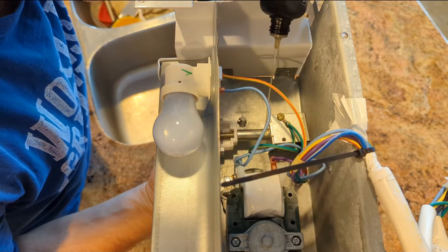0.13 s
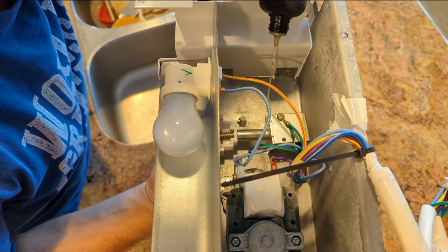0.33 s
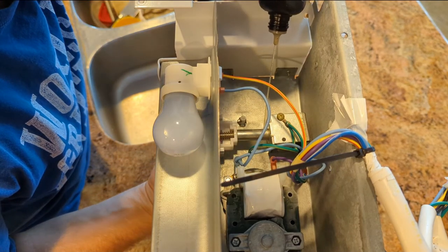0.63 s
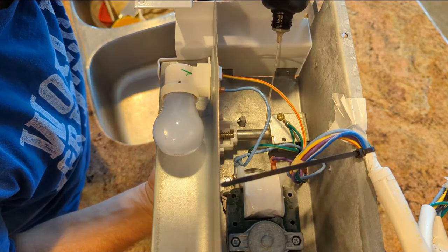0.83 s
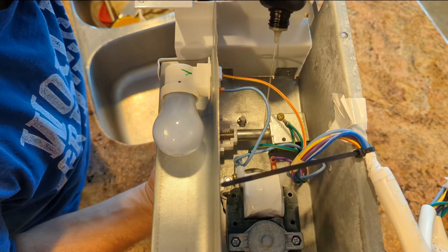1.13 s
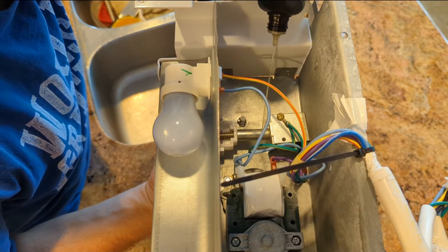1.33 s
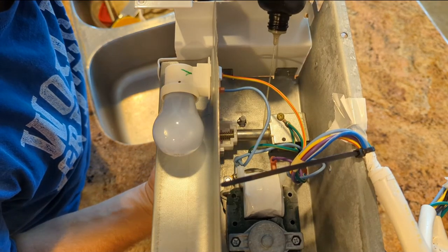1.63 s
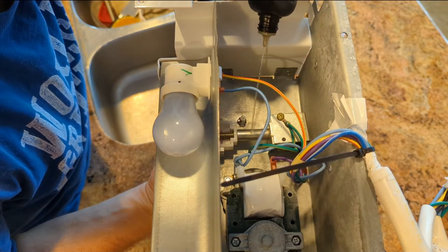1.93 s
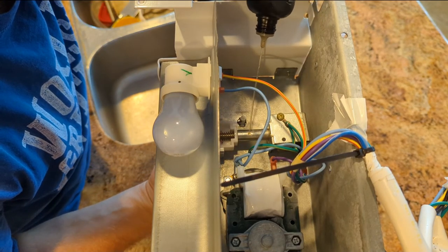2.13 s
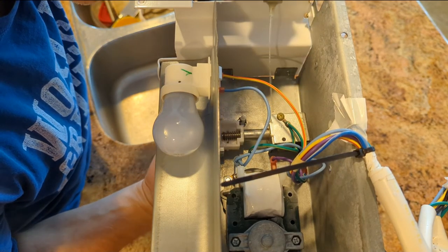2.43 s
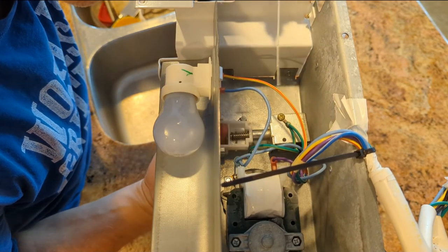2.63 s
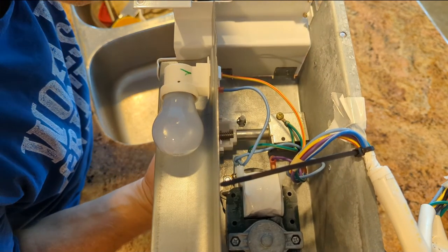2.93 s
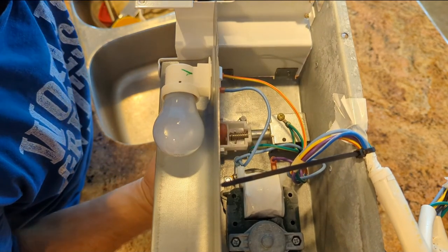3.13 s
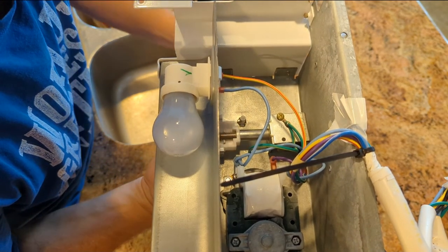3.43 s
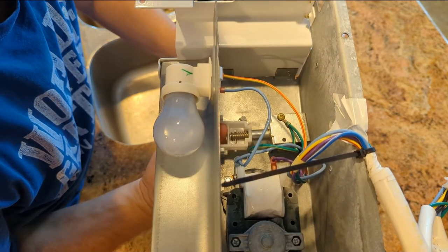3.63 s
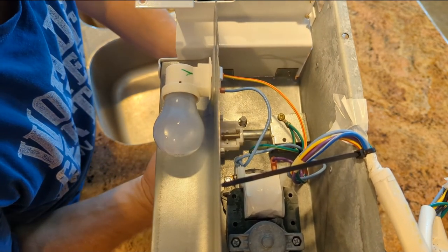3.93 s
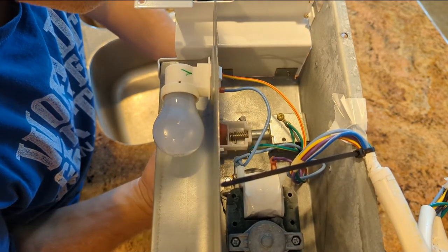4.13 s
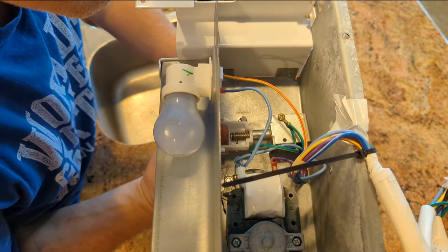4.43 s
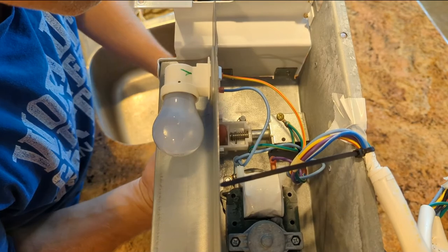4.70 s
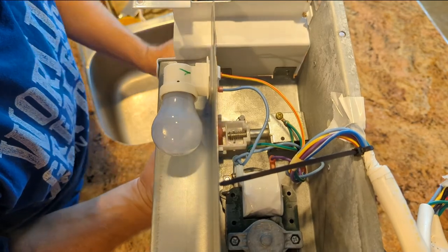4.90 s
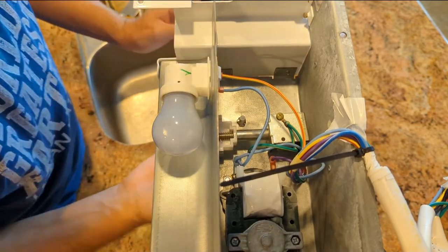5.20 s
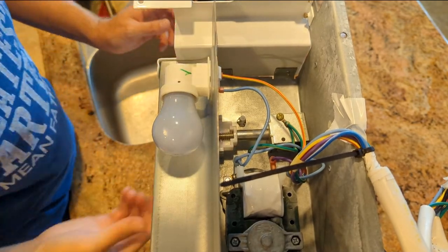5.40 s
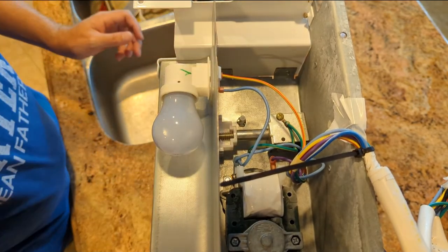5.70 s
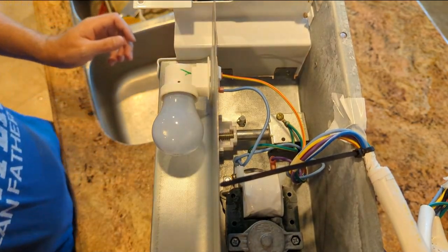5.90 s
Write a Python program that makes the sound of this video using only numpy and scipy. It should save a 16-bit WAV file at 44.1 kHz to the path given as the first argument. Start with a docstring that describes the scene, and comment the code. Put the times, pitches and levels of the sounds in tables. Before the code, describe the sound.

A quiet kitchen, soft air and a faint low drone from a distant appliance throughout. Tiny ticks at about 0.15 and 0.7 seconds are nearly lost in it. From 1.7 to 2.5 the hand fumbles the part: light taps, faint gritty sliding, soft clothing swishes. Short scrapes and clicks lead into the first slam at 2.6, a rattly metallic clack. Harder, tighter slams follow at 3.05, 3.5 and 3.95, and the hardest, brightest at 4.7. Each has a faint graze just before and a quick bounce after; thin sheet metal, plastic and a high steel rod ring, the room answers for about half a second, and the close microphone clips. Taps and short slides fall between, with a cloth swish near 3.75. After 5.0 only clothing swishes remain, with a dull light contact near 5.6 and a barely audible tick near 5.9, fading into room air.

```python
"""A hand works the spring-loaded plunger of an appliance part on a kitchen counter, over soft room air and
a distant appliance drone. Faint touches come first; then the plunger slides as gritty friction while clothes swish.
Five slams against the stop follow, each with a graze before and a bounce after: the sheet-metal frame,
plastic housing and steel rod ring, the kitchen answers, and peaks beyond full scale overload the recorder.
A few light contacts and swishes of cloth close the scene."""
import sys
import numpy as np
from scipy import signal
from scipy.fft import rfft, irfft
from scipy.io import wavfile
from scipy.ndimage import uniform_filter1d

SR = 44100
rng = np.random.default_rng(int(sys.argv[2]) if len(sys.argv) > 2 else 0)


def store_wav(level_fs):
    """Save 16-bit WAV to argv[1]."""
    pcm = np.round(np.clip(np.atleast_2d(level_fs), -1, 1) * 32767)
    wavfile.write(sys.argv[1], SR, pcm.T.astype(np.int16))


N = 267069  # length of the scene in samples
RING = 2 ** 15  # length of one ringing sound in samples

# Modes of the steel rod. Each row: frequency in Hz, relative level in dB, time to fall 60 dB in seconds.
ROD_MODES = [(5540, -31, .3), (5610, -27, .36), (5665, -25, .33), (5720, -27, .36), (5800, -31, .25),
             (6300, -33, .2), (7250, -36, .1), (7750, -33, .15), (7950, -34, .1), (8900, -36, .06),
             (11700, -42, .08), (12400, -46, .08), (14700, -50, .06)]


def gain_of(db):
    """Decibels to amplitude."""
    return 10 ** (np.asarray(db) / 20)


def evened(x):
    """Scales to unit rms."""
    return x / np.sqrt(np.mean(x ** 2) + 1e-20)


def read(points, hz):
    """Reads a table on a log-frequency axis."""
    f, value = np.transpose(points)
    return np.interp(np.log(hz + 1), np.log(f + 1), value)


def add(mix, s, sound):
    """Mixes a sound in at s seconds."""
    part = mix[round(s * SR):][:len(sound)]
    part += sound[:len(part)]


def tilted(x, slope_db):
    """Turns the spectrum about 1 kHz by so many dB per octave, in minimum phase: no sound before its cause."""
    n = len(x) // 2 * 2
    hz = np.fft.rfftfreq(n, 1 / SR)
    log_gain = slope_db * np.log2((hz + 100) / 1100) * np.log(10) / 20
    cepstrum = irfft(log_gain, n)
    cepstrum[1:n // 2] *= 2
    cepstrum[n // 2 + 1:] = 0
    return irfft(rfft(x[:n]) * np.exp(rfft(cepstrum)), n)


def ringing(modes):
    """Each mode of a struck body is a sine that decays exponentially; one mode a row."""
    hz, db, t60 = np.transpose(modes)[:, :, None]
    t = np.arange(RING) / SR
    return gain_of(db - 60 * t / t60) * np.sin(2 * np.pi * hz * t)


def dying_noise(t60, colour, size):
    """Noise whose every band dies at its own speed, as in a dense body or a room; unit energy."""
    hz = np.fft.rfftfreq(256, 1 / SR)
    t = np.arange(size // 64 + 4) * 64 / SR
    a, b = rng.standard_normal((len(t), len(hz), 2)).T
    z = (a + 1j * b) * gain_of(-60 * t / read(t60, hz)[:, None])
    x = signal.istft(z, nperseg=256, noverlap=192)[1][:size]
    x = irfft(rfft(x) * gain_of(read(colour, np.fft.rfftfreq(size, 1 / SR))), size)
    x *= signal.windows.tukey(2 * size, .2)[size:]  # fade out
    return x / np.linalg.norm(x)


def drifting_noise(colour_db, patchy_db):
    """Noise of random short-time spectra, with level patches that drift over frequency and time; unit rms."""
    a, b, patches = rng.standard_normal((N // 256 + 5, 513, 3)).T
    patches = uniform_filter1d(patches, 10, 0)  # across frequency bins
    patches = evened(uniform_filter1d(patches, 12, 1))  # across time frames
    z = (a + 1j * b) * gain_of(colour_db + patchy_db * patches)
    return evened(signal.istft(z, nperseg=1024, noverlap=768)[1][:N])


def room_tone():
    """Soft air noise with the fuzzy lines of a distant appliance, each a narrow band of noise."""
    # Colour of the room air. Each row: frequency in Hz, relative density in dB per Hz.
    air_colour = [(15, -53.5), (25, -27), (45, -19.5), (129, -7), (189, -18.5), (216, -9), (315, 0.5),
                  (390, -8), (585, -2.5), (634, -15), (706, -4.5), (766, -11.5), (1720, -17.5), (2310, -27),
                  (6000, -30), (15700, -41.5)]
    # Lines of the distant drone. Each row: frequency in Hz, width in Hz, level in dB.
    drone_lines = [(62.5, 4.3, -75.5), (129, 6.8, -76), (220, 15, -71.5), (358, 13, -63.5),
                   (396.7, 23, -66.5), (481.2, 24, -64.5), (600, 13, -70.5), (730, 6.6, -68)]
    air_db = -57
    colour_db = read(air_colour, np.fft.rfftfreq(1024, 1 / SR))
    air = drifting_noise(colour_db[:, None], patchy_db=.6)
    hz = np.fft.rfftfreq(N, 1 / SR)
    z = rfft(rng.standard_normal(N))
    drone = np.zeros(N)
    for line_hz, width_hz, db in drone_lines:
        resonance = 1 / (1 + ((hz - line_hz) / width_hz * 2) ** 2)
        drone += gain_of(db) * evened(irfft(z * resonance, N))
    return gain_of(air_db) * air + drone


def rustle():
    """Clothes swish as the arms move: cloth friction is a hiss that rises, holds and dies away."""
    # Colour of the cloth before its tilt. Each row: frequency in Hz, relative density in dB per Hz.
    cloth_colour = [(180, -5.5), (300, 0.5), (456, -23.5), (502, -13.5), (599, -3), (1340, -13),
                    (3630, -17.5), (14000, -44.5)]
    # Swishes of the clothes. Each row: start in seconds, hold in seconds, level in dB.
    swishes = [(1.904, 0.2, -62), (2.193, 0.069, -64.5), (2.445, 0.13, -65.5), (3.722, .16, -56),
               (4.392, .12, -65.5), (5.0, 0.039, -62), (5.094, .03, -55), (5.362, 0.088, -66),
               (5.491, .14, -59), (5.745, 0.04, -74), (5.92, 0.027, -79.5)]
    rise_s, fall_db_per_s, slope_db_per_octave = 0.016, 51, 2.5
    hz, t = np.fft.rfftfreq(1024, 1 / SR), np.arange(N) / SR
    colour_db = read(cloth_colour, hz) + slope_db_per_octave * np.log2((hz + 100) / 3500)
    level = np.zeros(N)
    for s, hold, db in swishes:
        rise = np.clip((t - s) / rise_s, 0, 1)
        falling_s = np.maximum(t - s - rise_s - hold, 0)
        level += rise * gain_of(db - fall_db_per_s * falling_s)
    return level * drifting_noise(colour_db[:, None], patchy_db=.7)


def kitchen(x):
    """The kitchen's answer: three diffuse tails crossfaded at 7 Hz for a smooth, even decay;
    each starts once the first walls are reached."""
    # Decay of the kitchen. Each row: frequency in Hz, time to fall 60 dB in seconds.
    kitchen_t60 = [(100, 1), (300, 0.61), (1200, 0.56), (2200, 0.64), (4000, 0.66), (7000, 0.55),
                   (14000, 0.32)]
    # Colour of the kitchen's answer. Each row: frequency in Hz, relative level in dB.
    kitchen_colour = [(60, 1), (500, -2.5), (1200, 0.5), (2000, -6), (4000, -2.5), (8000, -5.5), (14000, 0)]
    first_walls = np.zeros(250)  # samples of silence, 5.7 ms
    out = np.zeros(N)
    crossfade = 2 * np.pi * 7 * np.arange(N) / SR  # phase at 7 Hz
    for k in range(3):
        tail = dying_noise(kitchen_t60, kitchen_colour, size=RING)
        share = np.sqrt(2 / 3) * np.cos(crossfade + k * np.pi / 3)  # the three powers add up to one
        out += signal.fftconvolve(x * share, np.r_[first_walls, tail])[:N]
    return out


def slides():
    """Gritty friction excites the rod's modes, damped by the guide, over a broad hiss."""
    # The plunger sliding in its guide. Each row: start in seconds, end in seconds, relative level in dB.
    strokes = [(1.878, 1.928, -95), (1.94, 2.001, -67), (2.06, 2.197, -95), (2.565, 2.605, -53),
               (2.754, 2.821, -50), (2.964, 3.063, -68), (3.439, 3.484, -48.5), (3.675, 3.732, -67),
               (3.90, 3.967, -48), (4.637, 4.677, -47)]
    usual_db, usual_slope_db, dulling_per_db = -65, 1.65, -0.2378  # slope in dB per octave
    out = np.zeros(N)
    damped_modes = [(hz, .7 * db, .014) for hz, db, t60 in ROD_MODES]
    rod = ringing(damped_modes).sum(0)[:2048]
    rod /= np.linalg.norm(rod)
    rod[:2] += .5  # lets the broad hiss through
    for start, end, db in strokes:
        slope_db = usual_slope_db + dulling_per_db * (db - usual_db)  # harder slides are duller
        n = round((end - start) * SR)
        grit = rng.standard_normal(n) * gain_of(20 * uniform_filter1d(rng.standard_normal(n), 40))
        grit = evened(grit) * signal.windows.tukey(n, .35)
        add(out, start, gain_of(db) * tilted(signal.fftconvolve(grit, rod), slope_db))
    return out


def contacts():
    """Lists each slam with the graze before it and the bounce after it, then the taps, as rows for blows()."""
    # Plunger slams on its stop. Each row: time in seconds, relative blow in dB, brightness in dB per octave,
    # rattle decay in seconds, frame share in dB, rod share in dB, own tick in Hz, tick share in dB,
    # graze lead in seconds, bounce relative to the blow in dB.
    slams = [(2.6117, -0.5, 0.27, 0.011, -1.5, -16.5, 1790, 4.5, .015, -28),
             (3.0615, 3, 0.37, 0.0032, -5.5, -2, 1810, 0, 0.014, -4),
             (3.49, 3.5, 0.25, 0.0043, -3.5, -0.5, 1820, -9.5, .012, -11.5),
             (3.9578, 3.5, 0.37, 0.0029, -2.5, 0.5, 1769, 1, .014, -19.5),
             (4.6827, 5.5, 0.66, 0.0093, -4.5, -5, 586, -5.5, 0.01, -7.5)]
    # Light contacts. Each row: time in seconds, relative blow in dB, brightness in dB per octave,
    # own tick in Hz, tick share in dB.
    taps = [(.148, -50.5, 2, 3860, 7), (.7125, -57.5, 4, 3530, 5.5), (1.677, -62, -12, 895, 19.5),
            (1.73, -59, -11.5, 800, 18.5), (1.805, -33, 0.3, 2850, -2), (1.933, -33, 0.9, 1900, 5),
            (2.035, -46, 3.5, 3270, -1.5), (2.044, -45, -10, 606, 4), (2.083, -52, 4.5, 2600, 7),
            (2.131, -37.5, -7, 1540, 2), (2.265, -44, -5, 520, 5), (2.277, -40, -9, 516, -3),
            (2.303, -48.5, 1.5, 3500, 6), (2.421, -54, 4, 3550, -7), (2.5367, -25.5, 1.5, 1940, 1),
            (2.563, -28, 1, 1060, 0), (2.784, -27, 2, 3340, -9), (2.975, -36, -1.5, 1670, -7),
            (3.011, -32.5, 1, 790, 5), (3.026, -26.5, 4, 5580, 1.5), (3.425, -22, 2, 3710, -1.5),
            (3.468, -42, 5, 600, -8), (3.684, -57, 4, 7400, 10), (3.715, -31.5, 0.5, 1040, -5),
            (3.8178, -29, -5.5, 400, 11), (3.8208, -52, 6.5, 4120, 11), (3.833, -37.5, -10.5, 230, 1.5),
            (3.8829, -19.5, 3, 3605, -2.3), (3.901, -34, -0.5, 4580, -3), (4.283, -35, -6, 700, -4.5),
            (4.292, -42.5, -9, 245.5, 0.5), (4.387, -37, -3.5, 3440, 8), (4.388, -36.5, -2.5, 910, 10),
            (4.494, -56, 5.5, 2120, -10.5), (4.599, -51.5, 4.5, 2020, 5), (4.611, -53.5, -1.5, 6200, 8),
            (4.621, -37.5, 2.1, 1510, -2.5), (5.572, -42.5, -4.5, 700, 2.5), (5.939, -60, 5, 3070, 1)]
    bounce_lag_s = .018
    usual_tap_db, usual_rattle_s, rattle_per_db = -44, .002, 0.42
    rows = []
    # Each row: s, blow dB, brightness dB per octave, rattle s, frame dB, rod dB, tick Hz, tick dB.
    for s, db, slope_db, rattle, frame_db, rod_db, hz, tick_db, lead, bounce_db in slams:
        graze = (s - lead, db - 22.5, 2.5, 0.0088, 2.5, rod_db, 1900, -8.5)
        slam = (s, db, slope_db, rattle, frame_db, rod_db, hz, tick_db)
        bounce = (s + bounce_lag_s, db + bounce_db, 0.36, .003, -5.5, rod_db, 1846, 0.4)
        rows += [graze, slam, bounce]
    for s, db, slope_db, hz, tick_db in taps:
        rattle = usual_rattle_s * gain_of(rattle_per_db * (db - usual_tap_db))  # harder taps rattle longer
        frame_db = -1 - 0.49 * tick_db  # a tap with a strong tick of its own moves the frame less
        rows.append((s, db, slope_db, rattle, frame_db, -3, hz, tick_db))
    return rows


def blows():
    """Each contact rings frame and rod, shakes the housing, and chatters with its own brief tick."""
    # Modes of the sheet-metal frame. Each row: frequency in Hz, relative level in dB,
    # time to fall 60 dB in seconds.
    frame_modes = [(143, -20, .5), (235.3, -8, 0.32), (358.6, -11.5, 0.37), (375, -25, 0.19),
                   (555.3, -1, 0.15), (607, -4, 0.24), (636, -20.5, 0.13), (759.4, 1.5, 0.18),
                   (760, -3, 0.23), (915, -12.5, 0.24), (960, -7, 0.29), (939, -12, 0.52),
                   (1053.2, 3.5, 0.21), (1106, -11, 0.48), (1208, -18.5, 0.15), (1245, -7.5, 0.51),
                   (1424, -9.5, 0.04), (1482, -12, 0.46), (1600, -5, 0.17), (1795, -21, 0.13),
                   (1690, -21, 0.3), (1890, -24.5, 0.18), (2190, -10.5, 0.23), (2300, -31.5, .3),
                   (2550, -24.5, 0.39), (3150, -39.5, .2)]
    # Colour of the plastic housing. Each row: frequency in Hz, relative density in dB per Hz.
    housing_colour = [(24, -60.5), (40, -37), (351, -14), (762, 0), (908, -9), (1050, -5.5), (1610, -14),
                      (2020, -11), (2590, -21), (5200, -25.5), (5670, -14), (6200, -22.5), (10000, -35),
                      (15700, -55.5)]
    # Decay of the housing. Each row: frequency in Hz, time to fall 60 dB in seconds.
    housing_t60 = [(100, 0.15), (700, 0.12), (2000, 0.15), (5000, 0.062), (13000, 0.077)]
    frame, rod = ringing(frame_modes), ringing(ROD_MODES)
    out, t = np.zeros(N), np.arange(RING) / SR
    tick_t = t[:8192]
    fade = signal.windows.tukey(2 * RING, .3)[RING:]
    for s, db, slope_db, rattle, frame_db, rod_db, hz, tick_db in contacts():
        # where it lands sets the level and sign of each frame mode
        spot = gain_of(0.37 * rng.standard_normal(len(frame_modes))) * rng.choice([-1, 1], len(frame_modes))
        loose = 1 + 0.48 * evened(uniform_filter1d(rng.standard_normal(RING), 300))  # rod buzzes in its guide
        rod_ring = loose * (rng.choice([-1, 1], len(ROD_MODES)) @ rod)
        metal = gain_of(frame_db) * spot @ frame + gain_of(rod_db) * rod_ring

        chatter = rng.standard_normal(1024) * (rng.random(1024) < .05)  # sparse hits
        chatter *= np.exp(-t[:1024] / rattle)
        chatter[0] = 1.8  # first touch
        tick_t60 = .012 + 10 / hz  # seconds; low ticks last longer
        tick = gain_of(tick_db - 60 * tick_t / tick_t60) * np.sin(2 * np.pi * hz * tick_t)

        body = 8.37 * dying_noise(housing_t60, housing_colour, size=RING) + 0.18 * metal
        crack = signal.lfilter(*signal.butter(3, 8500, fs=SR), rng.standard_normal(RING))  # metal on metal
        body += gain_of(0.58 * db - 13.5 - 60 * t / 0.027) * crack  # harder blows crack more
        body *= 1 - np.exp(-t / (0.22 * rattle))  # a long rattle builds up slowly
        tick *= 1 - np.exp(-tick_t * hz * 2)  # starts within a cycle
        add(body, 0, 0.6 * signal.fftconvolve(tick, chatter / np.linalg.norm(chatter)))
        add(out, s, gain_of(db) * tilted(body, slope_db) * fade)
    return signal.lfilter(*signal.butter(3, 75, "high", fs=SR), out)  # a small part radiates no deep bass


def scene():
    """The part, its echo in the kitchen, clothes and room tone."""
    part = blows() + slides()
    echo = gain_of(-14.5) * kitchen(part)
    return (part + echo + rustle() + room_tone())[None]


def record(dry):
    """The recorder overloads hard just below full scale, then a steep low-pass limits the band."""
    held = np.clip(dry, -.98, .98)
    band_limit = signal.firwin(1023, 15860, window=("kaiser", 9), fs=SR)  # edge in Hz
    return signal.oaconvolve(held, band_limit[None], "same")


dry = scene()
out = record(dry)
store_wav(out)
```